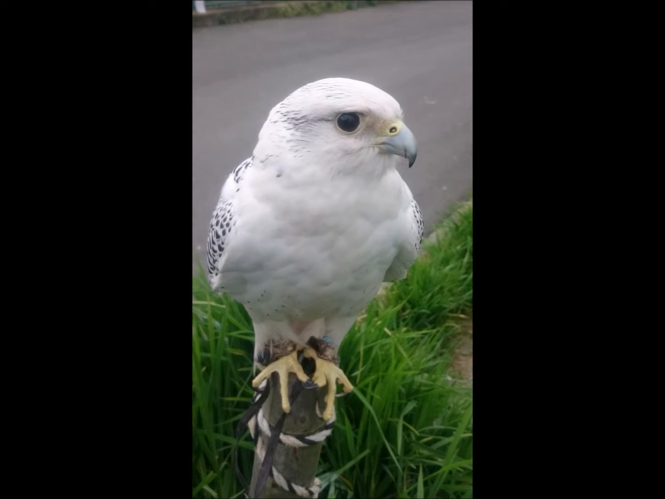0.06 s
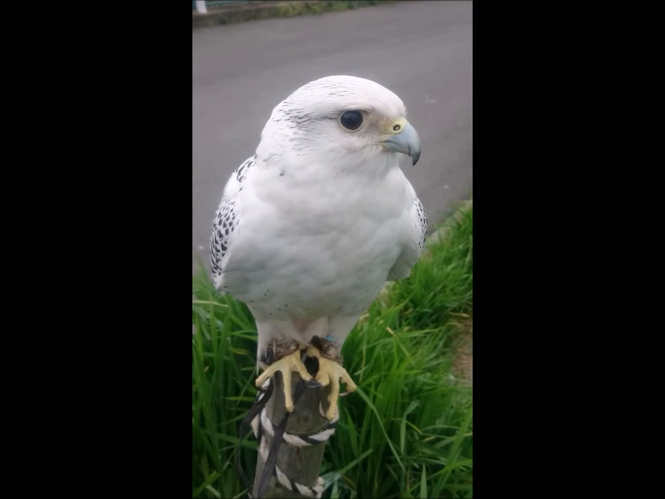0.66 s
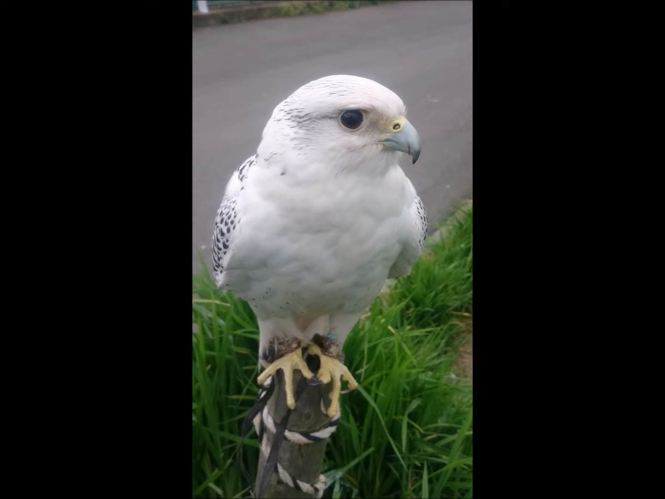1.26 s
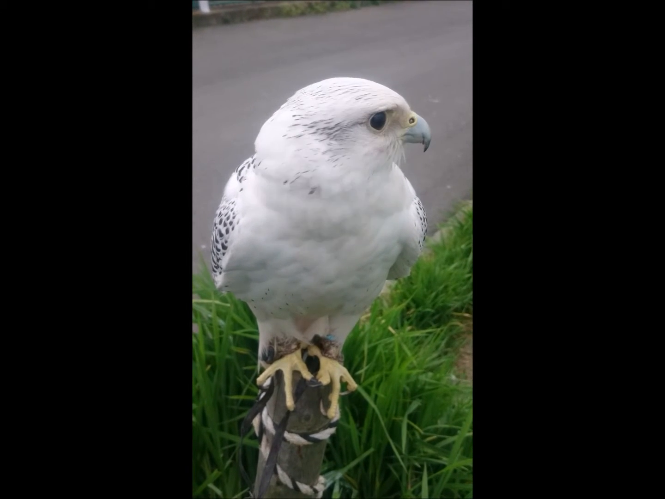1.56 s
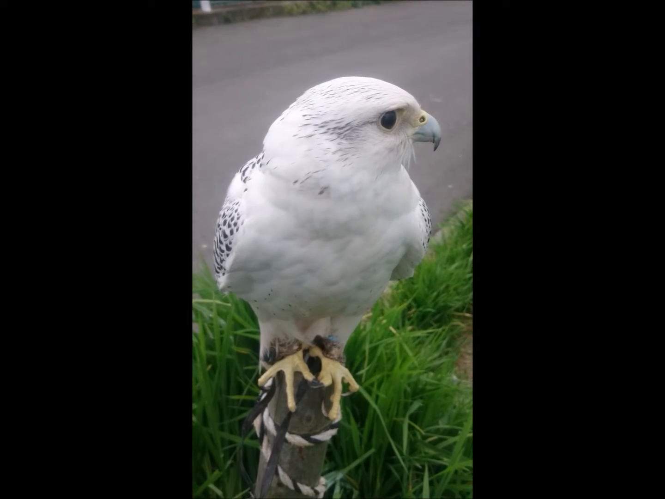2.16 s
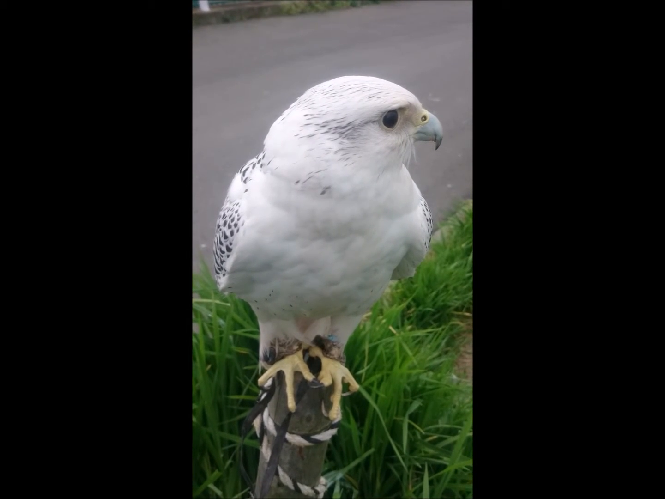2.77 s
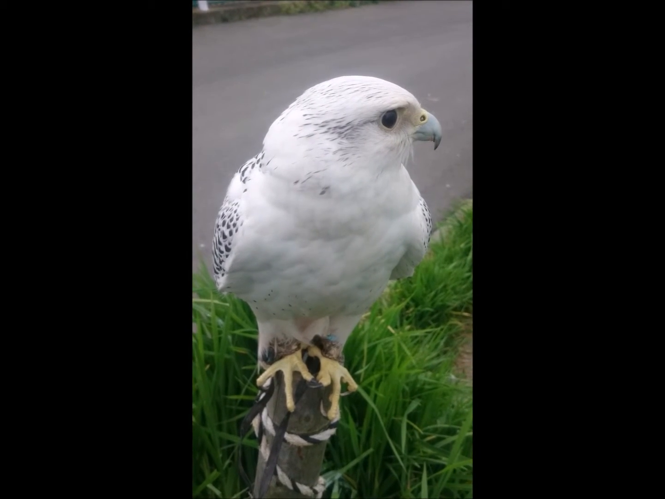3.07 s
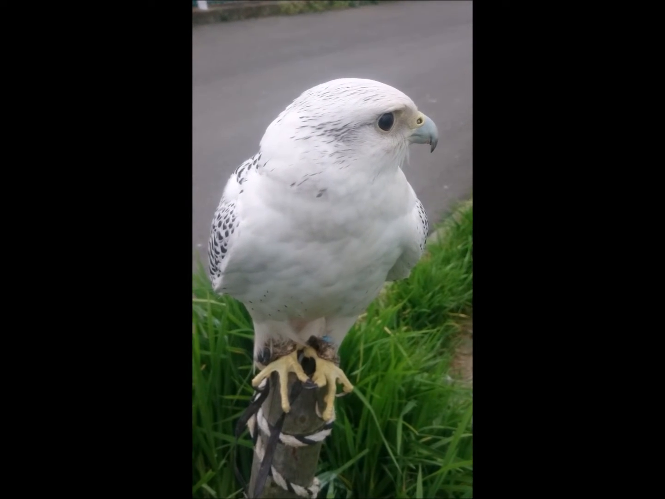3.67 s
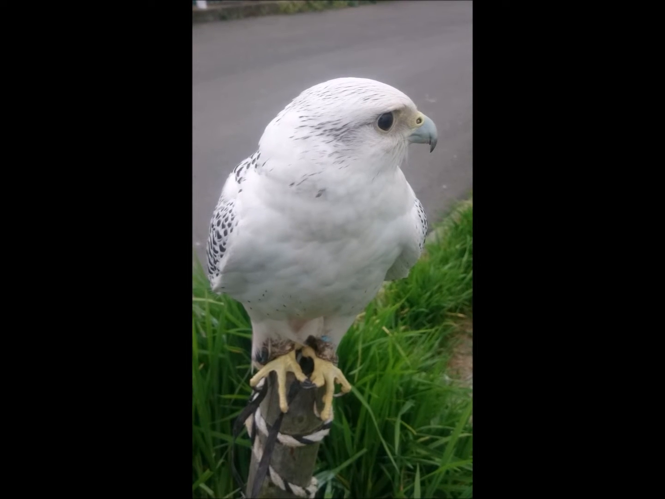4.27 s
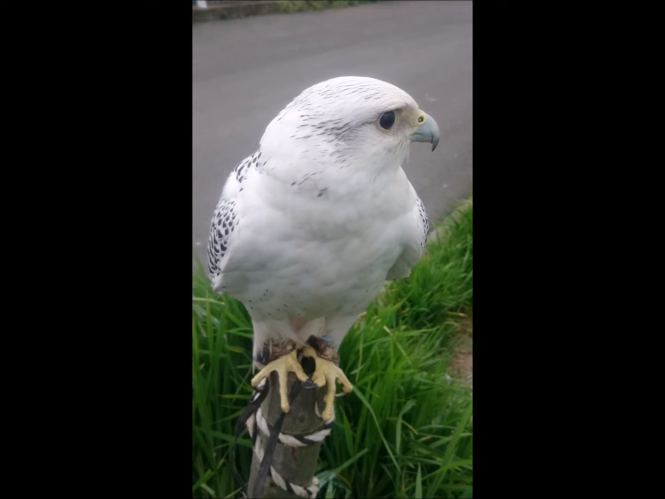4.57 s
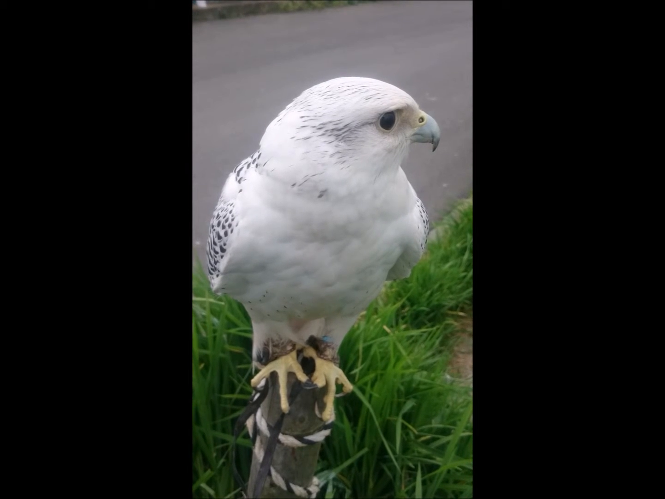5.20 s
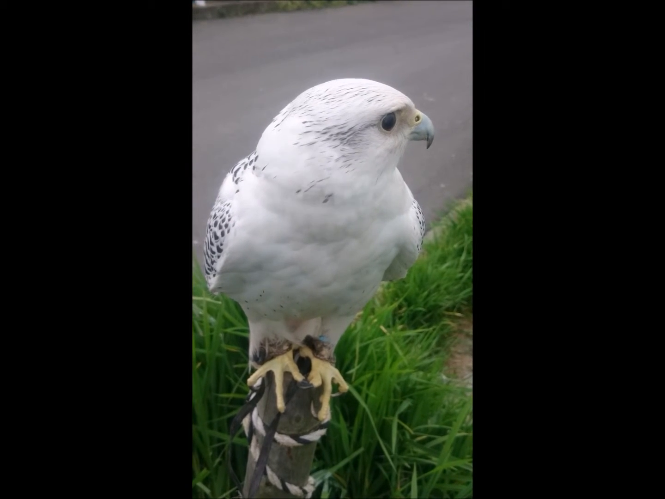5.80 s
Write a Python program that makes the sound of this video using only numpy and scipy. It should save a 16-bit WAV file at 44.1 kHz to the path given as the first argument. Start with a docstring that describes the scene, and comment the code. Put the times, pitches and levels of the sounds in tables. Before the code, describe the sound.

A distant jet passes over a grassy roadside with a deep, fluttering rumble and an airy rush. Close by, a light breeze hisses softly in the grass and something clicks once. The roar then swells twice, joined at first by faint, thin high whistles, before easing back. Two closely spaced microphones pick it up in stereo, crackling slightly on the loudest waves.

```python
"""A distant jet passes: the eddies of its exhaust rumble and roar, swell twice and fade.
Close by, a light breeze brushes the blades of a grass verge into a hiss, and something clicks once.
Thin high whistles glide and flutter from afar. Two closely spaced microphones hear it all;
the biggest waves of the rumble overload them slightly, with faint crackle and fizz."""
import sys
import numpy as np
from scipy import signal
from scipy.fft import rfft, irfft
from scipy.io import wavfile
from scipy.ndimage import uniform_filter1d

SR = 44100
rng = np.random.default_rng(int(sys.argv[2]) if len(sys.argv) > 2 else 0)


def to_wav(sig):
    """Store sig (one row per channel, or 1-D mono) as 16-bit WAV at the path in sys.argv[1].

    Samples outside -1..1 are clipped; the rate is SR.
    """
    pcm = np.clip(np.atleast_2d(sig), -1, 1) * 32767
    pcm = np.round(pcm).astype(np.int16)
    wavfile.write(sys.argv[1], SR, pcm.T)  # frames by channels


N = 261954
TIME = np.arange(N) / SR
FREQ = np.maximum(np.arange(N // 2 + 1) * SR / N, 1)
ROAR_STEADY_S, WHISTLE_PEAKEDNESS = .11, .45


def undb(db):
    """Decibels to gain."""
    return 10 ** (np.asarray(db) / 20)


def place(pan_db):
    """Left and right gains; pan_db is always left minus right."""
    return undb(np.array([[pan_db], [-pan_db]]) / 2)


def across(points):
    """A curve over frequency: points joined on a log axis."""
    hz, value = np.transpose(points)
    return np.interp(np.log(FREQ), np.log(hz), value)


def arch(start_s, length_s, peakedness):
    """An envelope that rises to 1 and returns; a low peakedness flattens its top."""
    along = np.clip((TIME - start_s) / length_s, 0, 1)
    return (1 - (2 * along - 1) ** 2) ** peakedness


def swell(start_s, attack_s, hold_s, release_s):
    """An envelope from 0 to 1 and back in straight ramps."""
    return np.interp(TIME, start_s + np.cumsum([0, attack_s, hold_s, release_s]), [0, 1, 1, 0])


def walk(per_s):
    """Smooth random wobble with a spread of 1."""
    size = int(SR / per_s)
    steps = np.repeat(rng.standard_normal(N // size + 1), size)
    smooth = uniform_filter1d(uniform_filter1d(steps, size), size)[:N]
    return smooth / smooth.std()


def white():
    """Spectrum of fresh white noise."""
    return rfft(rng.standard_normal(N))


def band(hz, width_hz):
    """Gain curve of one flat-topped resonance."""
    return 1 / (1 + (2 * (FREQ - hz) / width_hz) ** 4)


def narrow(hz, width_hz):
    """Noise in one resonance, rms 1."""
    noise = irfft(white() * band(hz, width_hz), N)
    return noise / noise.std()


def field(colour, hold_s):
    """Coloured noise at both microphones, its mono level evened out to 1 over hold_s."""
    # how alike the two sides are: freq_hz, coherence (0-1)
    likeness = [(40, .995), (250, .99), (400, .88), (560, .5), (700, .72), (860, .73), (1400, .3),
                (2400, .2), (4300, .45), (7000, .12)]
    # how far the left side leads: freq_hz, phase_rad
    phase_lead = [(45, 0.84), (130, 0.72), (350, 0.26), (520, 0.046), (700, 1.4), (1080, 0.82), (1750, 3.4),
                  (2400, 5.4), (2850, 9.4), (4570, 12.6), (6460, 18.6)]
    # stereo balance: freq_hz, pan_db
    balance = [(50, -7), (130, -2), (400, -4), (650, 1), (1100, 2), (1900, -3), (3000, 3), (4200, -6),
               (5200, -11), (6500, 2), (7700, 7), (9000, -2), (14000, -6)]
    alike, lead, pan = across(likeness), across(phase_lead), undb(across(balance) / 2)
    shared = white() * np.sqrt(alike)
    left = (shared + white() * np.sqrt(1 - alike)) * pan * np.exp(1j * lead)
    right = (shared + white() * np.sqrt(1 - alike)) / pan
    mono_gain = np.sqrt(pan ** 2 + pan ** -2 + 2 * alike * np.cos(lead))
    pair = irfft(np.array([left, right]) * colour / mono_gain, N)
    return pair / np.sqrt(uniform_filter1d(pair.mean(0) ** 2, int(hold_s * SR)))


def self_noise(level_db):
    """The steady, even hiss of each microphone."""
    return undb(level_db) * rng.standard_normal((2, N))


def grass(start_db, rise_db, build_s):
    """Many blades brush each other; the hiss builds with the breeze, lifts in puffs and flickers."""
    # spectrum of the hiss: freq_hz, relative_db
    colour = [(1500, -14.5), (2600, -6.5), (3300, -8), (4300, 1.5), (5200, 0), (6000, -6), (6900, -9),
              (8000, -8), (9000, -18), (10500, -20.5), (13500, -23), (15700, -27.5)]
    # puffs of wind: start_s, length_s, lift_db, pan_db
    puffs = [(.2, 0.6, 2, .5), (1.48, .16, 2.2, 2.5), (4.12, 0.18, 1.5, .5), (4.3, .6, 0.6, 0)]
    breeze_db = start_db + rise_db * np.minimum(TIME / build_s, 1)
    puff_db = sum((lift_db + np.array([[pan_db], [-pan_db]]) / 2) * arch(s, length_s, peakedness=.5)
                  for s, length_s, lift_db, pan_db in puffs)
    return field(undb(across(colour)), hold_s=.27) * undb(breeze_db + puff_db + .5 * walk(30))


def blade_ticks(per_s, spread_db, level_db, decay_s, low_cut_hz):
    """Blades touch at random in tiny bright ticks, a few stronger than the rest."""
    touches = rng.random((2, N)) < per_s / SR
    strength = undb(spread_db * np.minimum(rng.exponential(size=(2, N)), 3))
    envelope = signal.lfilter([1], [1, -np.exp(-1 / (decay_s * SR))], touches * strength)
    ticks = envelope * rng.standard_normal((2, N))
    return undb(level_db) * irfft(rfft(ticks) / (1 + (low_cut_hz / FREQ) ** 4), N)


def ringing_ticks():
    """Faint short high ticks, each ringing for a few milliseconds in a narrow band."""
    # ticks: start_s, level_db, centre_hz, width_hz, decay_s, pan_db
    ticks = [(.319, -52, 4750, 1100, .0025, -13), (.363, -53, 4650, 1000, .003, -8),
             (.488, -59.5, 7900, 350, .004, 0), (.553, -59, 7900, 400, .004, -3),
             (3.306, -61, 7950, 600, .007, 1), (5.412, -54, 8100, 2200, .0012, 4),
             (5.527, -57, 5500, 300, .004, -4), (5.839, -51, 5100, 1200, .003, -10),
             (5.863, -49.5, 4900, 1400, .0025, -11)]
    mix = np.zeros((2, N))
    for start_s, level_db, centre_hz, width_hz, decay_s, pan_db in ticks:
        age = np.maximum(TIME - start_s, 0) / decay_s
        envelope = age * np.exp(1 - age)
        mix += undb(level_db) * envelope * narrow(centre_hz, width_hz) * place(pan_db)
    return mix


def whistles(flutter_db):
    """Faint far-off near-sines that tremble in pitch and strength; most glide slowly upward."""
    # tones: start_s, length_s, pitch_hz, glide_hz_per_s, level_db, waver_hz, pan_db
    tones = [(.95, .85, 5065, 12, -73, 10, -1), (1.15, .22, 5085, 0, -69.5, 6, -1),
             (1.95, .43, 4010, 220, -66, 45, -6), (2.39, .38, 3975, 450, -63.5, 30, -6)]
    mix = np.zeros((2, N))
    for start_s, length_s, pitch_hz, glide_hz_per_s, level_db, waver_hz, pan_db in tones:
        hz = pitch_hz + glide_hz_per_s * (TIME - start_s) + waver_hz * walk(220)
        tone = np.sqrt(2) * np.sin(2 * np.pi * np.cumsum(hz) / SR)
        envelope = arch(start_s, length_s, WHISTLE_PEAKEDNESS)
        mix += tone * envelope * undb(level_db + flutter_db * walk(70)) * place(pan_db)
    return mix


def pips(length_s, glide_hz_per_s, pan_db):
    """The lower whistle flares in short pips, each rising in pitch."""
    # flares: middle_s, pitch_hz, level_db
    flares = [(1.968, 4000, -58), (2.048, 4040, -58), (2.075, 4070, -57), (2.225, 4060, -55),
              (2.302, 4080, -55), (2.42, 3995, -53), (2.479, 4015, -51.5), (2.502, 4015, -55),
              (2.545, 4040, -53), (2.585, 4060, -56), (2.61, 4090, -57), (2.648, 4050, -56),
              (2.875, 4280, -57), (3.192, 4285, -53)]
    mix = np.zeros(N)
    for middle_s, pitch_hz, level_db in flares:
        age = TIME - middle_s
        phase = 2 * np.pi * (pitch_hz * age + glide_hz_per_s * age ** 2 / 2 + rng.random())
        envelope = arch(middle_s - length_s / 2, length_s, peakedness=2.8)
        mix += np.sqrt(2) * np.sin(phase) * undb(level_db) * envelope
    return mix * place(pan_db)


def frayed_whistle(pan_db):
    """The lower whistle frays into a narrow hiss that widens at its end."""
    # breathy bands: start_s, length_s, pitch_hz, width_hz, level_db
    frays = [(1.95, .8, 4060, 190, -61), (2.6, .78, 4230, 340, -60)]
    return sum(narrow(hz, width_hz) * undb(db) * arch(s, length_s, WHISTLE_PEAKEDNESS)
               for s, length_s, hz, width_hz, db in frays) * place(pan_db)


def port_ring(modes):
    """Response of a microphone port: its resonances, with no bass and a soft top."""
    ring = sum(undb(db) / (1 + 1j * (FREQ - hz ** 2 / FREQ) / width_hz) for hz, width_hz, db in modes)
    passband = signal.butter(4, (3600, 14000), "band", analog=True)
    return ring * signal.freqs(*passband, FREQ)[1]


def click(start_s, strength_db, lag_s, pan_db, body_db, body_hz):
    """One sharp impulse with a faint lower body rings both ports, the right a little later."""
    # resonances of the left and right ports: pitch_hz, width_hz, gain_db
    left_modes = [(4500, 800, -4), (8030, 450, -.5), (9600, 600, -9), (11800, 2000, -11)]
    right_modes = [(4500, 750, -2), (5700, 490, 7), (12500, 1200, -18)]
    impulse = undb(strength_db) * np.exp(-2j * np.pi * FREQ * start_s)
    body = undb(body_db) / (1 + 2j * (FREQ / body_hz - body_hz / FREQ)) ** 2
    left = port_ring(left_modes) + body
    right = (port_ring(right_modes) + body) * np.exp(-2j * np.pi * FREQ * lag_s)
    return irfft(impulse * np.array([left, right]), N) * place(pan_db)


def fizz(pan_db):
    """The microphones sizzle faintly in spurts at the height of the rumble."""
    # spurts: middle_s, length_s, level_db
    spurts = [(1.79, .05, -73), (2.08, .03, -73), (2.155, .06, -67.5), (2.19, .02, -68), (2.27, .025, -70),
              (2.322, .06, -66), (2.42, .09, -68.5), (2.465, .04, -67), (2.525, .025, -68),
              (2.62, .06, -72), (2.69, .07, -70), (2.775, .025, -70), (2.86, .16, -70), (2.98, .04, -72),
              (3.04, .03, -70), (3.066, .025, -65), (3.2, .025, -67), (3.29, .05, -71), (3.46, .03, -72)]
    # bands of the sizzle: centre_hz, width_hz, gain_db
    bands = [(12000, 600, 0), (6050, 450, 5.5)]
    envelope = sum(undb(db) * arch(s - length_s / 2, length_s, peakedness=.98)
                   for s, length_s, db in spurts)
    sizzle = sum(undb(db) * narrow(hz, width_hz) for hz, width_hz, db in bands)
    return envelope * sizzle * place(pan_db)


def crackles(low_hz, slope_hz, high_hz, pan_db):
    """The overloaded right microphone gives dry, dull snaps, each one filtered impulse."""
    # snaps: start_s, level_db
    snaps = [(2.0785, -39), (2.1437, -39.5), (2.3085, -42), (2.3415, -44), (2.4295, -42), (2.458, -37),
             (2.4596, -35.5), (2.472, -38.5), (2.6605, -43), (2.6695, -38), (2.672, -37.5), (2.7718, -35),
             (2.814, -40), (2.8205, -37), (2.823, -34), (2.828, -38), (2.87, -39.5), (3.067, -42),
             (3.201, -41), (3.286, -42)]
    colour = 1 / (1 - 1j * low_hz / FREQ) / (1 + 1j * FREQ / slope_hz) ** 2
    colour *= signal.freqs(*signal.butter(2, high_hz, analog=True), FREQ)[1]
    impulses = sum(undb(db) * np.exp(-2j * np.pi * FREQ * s) for s, db in snaps)
    return irfft(impulses * colour, N) / irfft(colour, N).max() * place(pan_db)


def echo(dry, lag_s, drift_s, echo_db):
    """A weak late reflection; its lag drifts as the jet moves and ripples the spectrum."""
    then = TIME - lag_s - drift_s * TIME / TIME[-1]
    late = np.array([np.interp(then, TIME, side) for side in dry])
    return (dry + undb(echo_db) * late) / np.sqrt(1 + undb(2 * echo_db))


def eddies(low_hz, high_hz, hold_s):
    """The band of exhaust noise made by eddies of one size."""
    # spectrum of the exhaust: freq_hz, relative_db
    colour = [(15, -33.5), (30, -25.5), (44, -16.5), (56, -5), (75, -0.5), (145, -1.5), (210, -8.5),
              (360, -15.5), (530, -20), (700, -25), (1170, -36.5), (1380, -43.5), (1700, -48),
              (2200, -57.5), (6000, -92.5)]
    share = 1 / np.sqrt((1 + (low_hz / FREQ) ** 12) * (1 + (FREQ / high_hz) ** 12))
    return field(undb(across(colour)) * share, hold_s)


def howls():
    """Narrow bands of exhaust noise stand out for a moment and give the roar a hollow pitch."""
    # hollow tones: start_s, length_s, pitch_hz, width_hz, level_db
    tones = [(.72, .55, 1190, 140, -48), (1.7, .4, 280, 90, -28.5), (2.3, .8, 150, 40, -19),
             (2.65, .65, 270, 50, -27), (3.22, .18, 140, 40, -18), (3.58, .6, 265, 100, -29.5),
             (3.98, .45, 192, 45, -23), (4.55, .6, 150, 50, -25)]
    return sum(field(band(hz, width_hz), ROAR_STEADY_S) * undb(db) * arch(s, length_s, peakedness=.78)
               for s, length_s, hz, width_hz, db in tones)


def rush(tearing_db, follow, fade_db_per_s):
    """Small eddies rush in the mids; the smallest tear above them, partly following, and fade."""
    # level ride of the two rush bands: time_s, lower_db, upper_db
    ride = [(0, -27.5, -29.5), (0.3, -31.5, -32), (.75, -29.5, -27), (1.1, -24.5, -27.5),
            (1.55, -29, -30.5), (1.85, -23.5, -28.5), (2.55, -28, -29), (3.0, -28, -31), (3.35, -30, -34.5),
            (3.75, -31.5, -29), (4.05, -29.5, -30.5), (4.5, -28, -30.5), (5.0, -30, -38.5),
            (5.5, -31, -36.5), (5.94, -29.5, -32)]
    time_s, *levels = np.transpose(ride)
    lower_db, upper_db = [np.interp(TIME, time_s, db) for db in levels]
    lower = eddies(277, 443, hold_s=.25) * undb(lower_db + .5 * walk(7.6))
    upper = eddies(421, 630, hold_s=.26) * undb(upper_db + .5 * walk(9.7))
    rush_db = (lower_db + upper_db) / 2
    motion_db = follow * (rush_db - rush_db.mean()) + .66 * walk(22)
    fade_db = fade_db_per_s * (TIME - TIME.mean())
    tearing = eddies(706, 6000, hold_s=.15) * undb(tearing_db + motion_db - fade_db)
    return lower + upper + tearing


def roar(flutter_per_s, flutter_db):
    """Big eddies rumble and roar, swell twice, flutter in moving air and fade as the jet recedes."""
    # eddies, large to small: low_hz, high_hz, start_db, fade_db_per_s, swell_share, swell_power, late_s
    sizes = [(18, 97.3, -17, 0.85, 0.49, 0.82, 0), (110.2, 154, -16, 1.3, 0.9, 0.77, 0.012),
             (162.6, 287, -19.5, 1.0, 0.79, 3.8, 0.26)]
    # swells of the exhaust: start_s, attack_s, hold_s, release_s, rise_db
    swells = [(1.84, .24, 1.04, .5, 7.3), (3.56, .2, .62, .92, 5.7)]
    # deep throbs of the biggest eddies: start_s, length_s, rise_db
    throbs = [(.88, .36, 2.5), (1.89, .15, 3.5), (2.25, .15, 2), (3.38, .12, 4), (3.61, .14, 3)]
    lull_db = -3.6 * arch(start_s=3.46, length_s=.18, peakedness=1)  # a dip between the swells
    layers = []
    for low_hz, high_hz, start_db, fade_db_per_s, swell_share, swell_power, late_s in sizes:
        swell_db = sum(rise_db * swell(s + late_s, attack_s, hold_s - late_s, release_s) ** swell_power
                       for s, attack_s, hold_s, release_s, rise_db in swells)
        level_db = start_db - fade_db_per_s * TIME + swell_share * swell_db + lull_db
        level_db += flutter_db * walk(flutter_per_s)
        layers.append(eddies(low_hz, high_hz, ROAR_STEADY_S) * undb(level_db))
    rumble, low_roar, high_roar = layers
    throb_db = sum(rise_db * arch(s, length_s, peakedness=.78) for s, length_s, rise_db in throbs)
    return rumble * undb(throb_db) + low_roar + high_roar


def jet():
    """Turbulent exhaust: a deep roar, a mid-range rush with its reflection, and passing howls."""
    lows = roar(flutter_per_s=12, flutter_db=.95)
    mids = rush(tearing_db=-35.5, follow=.29, fade_db_per_s=.5)
    return lows + echo(mids, lag_s=.022, drift_s=.0015, echo_db=-14.5) + howls()


def scene():
    """Grass, far whistles and small close sounds under the jet, in open air."""
    verge = grass(start_db=-59.5, rise_db=5, build_s=4.2)
    verge += blade_ticks(per_s=25, spread_db=4, level_db=-66, decay_s=.003, low_cut_hz=3500)
    far = whistles(flutter_db=3.6) + pips(length_s=.036, glide_hz_per_s=3000, pan_db=-6)
    far += frayed_whistle(pan_db=-5.5)
    near = ringing_ticks() + fizz(pan_db=-2.5)
    near += crackles(low_hz=1000, slope_hz=2400, high_hz=5500, pan_db=-18)
    near += click(start_s=1.6461, strength_db=-.5, lag_s=.00026, pan_db=6, body_db=-15, body_hz=2000)
    return verge + far + near + jet() + self_noise(level_db=-62.5)


def record(dry):
    """The microphones overload softly, rounding the tallest waves; the top is cut."""
    ceiling, knee, top_hz = .89, 6, 15750
    rounded = dry / (1 + np.abs(dry / ceiling) ** knee) ** (1 / knee)
    return signal.sosfilt(signal.ellip(8, .1, 70, top_hz, fs=SR, output="sos"), rounded)


dry = scene()
out = record(dry)
to_wav(out)
```